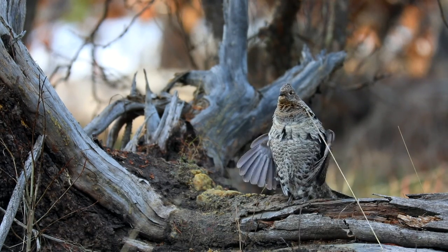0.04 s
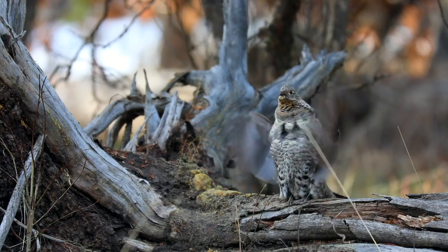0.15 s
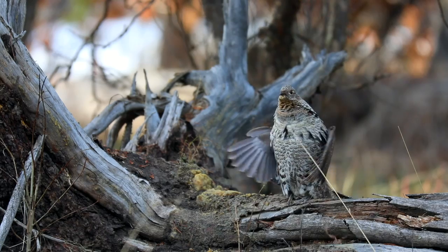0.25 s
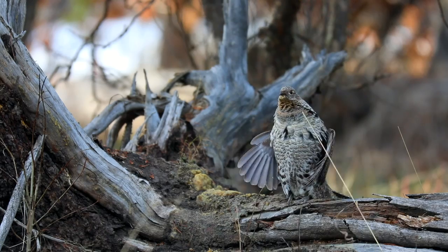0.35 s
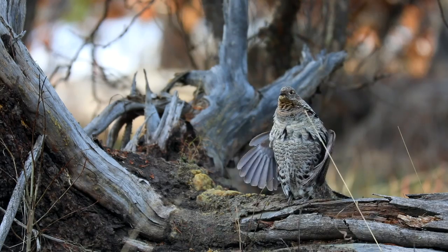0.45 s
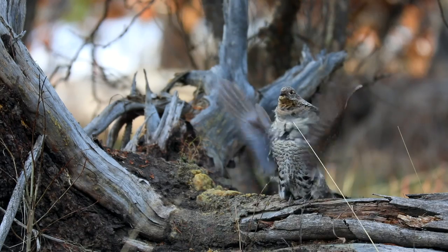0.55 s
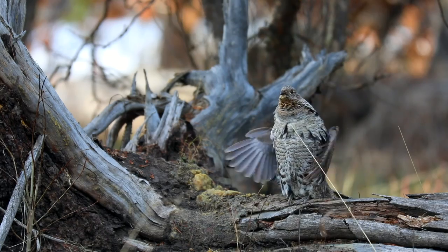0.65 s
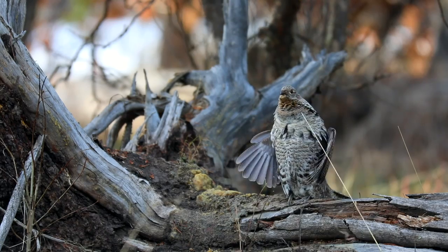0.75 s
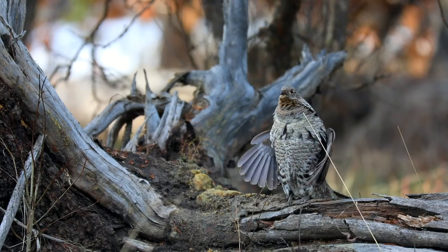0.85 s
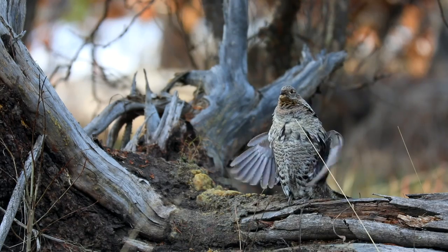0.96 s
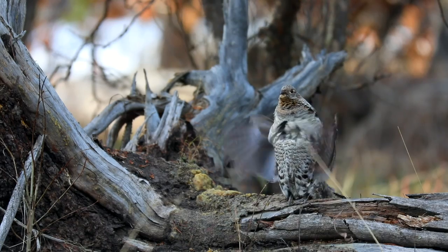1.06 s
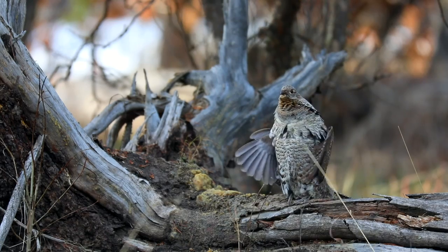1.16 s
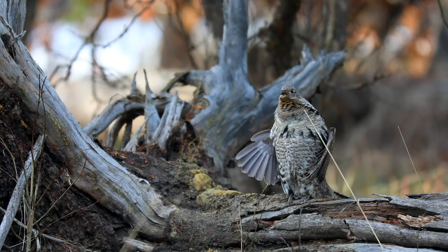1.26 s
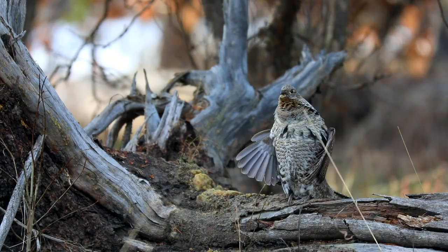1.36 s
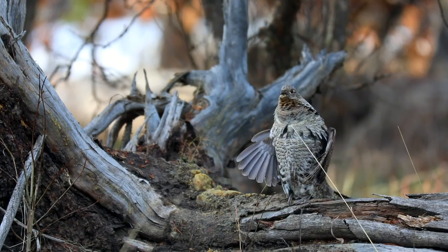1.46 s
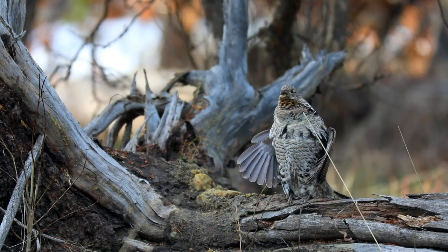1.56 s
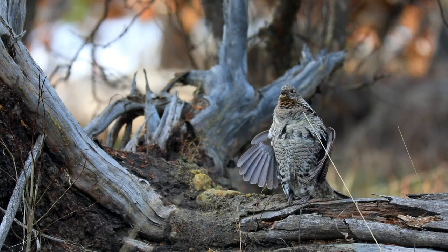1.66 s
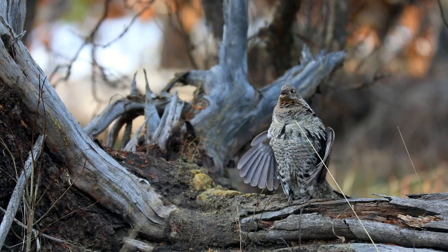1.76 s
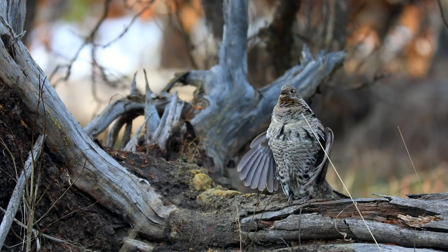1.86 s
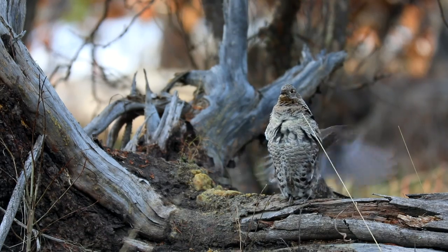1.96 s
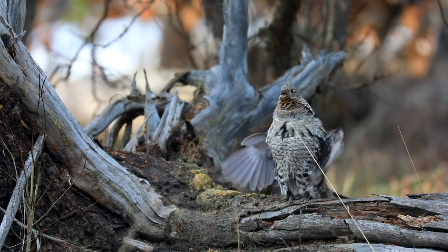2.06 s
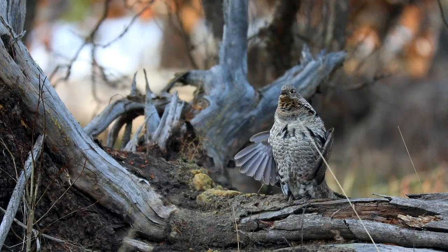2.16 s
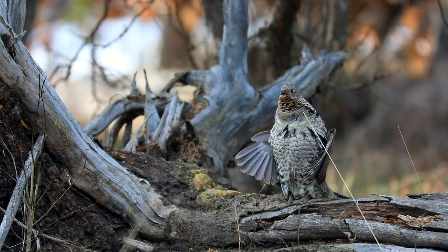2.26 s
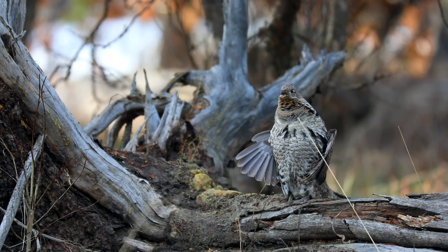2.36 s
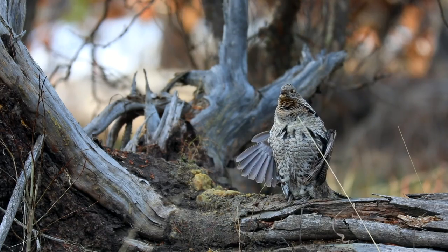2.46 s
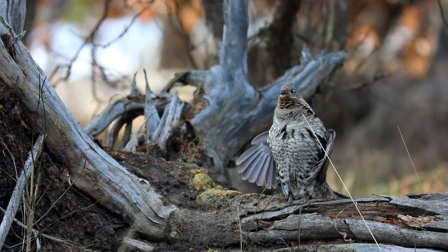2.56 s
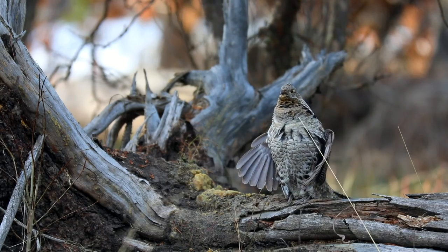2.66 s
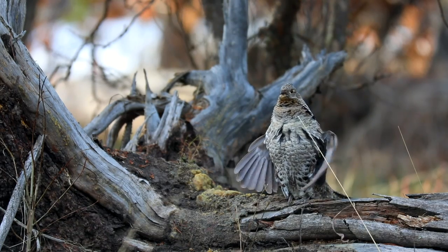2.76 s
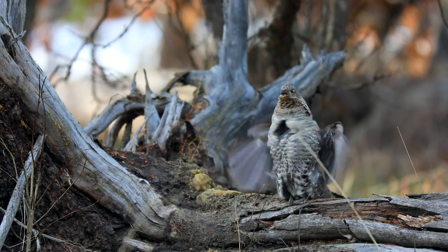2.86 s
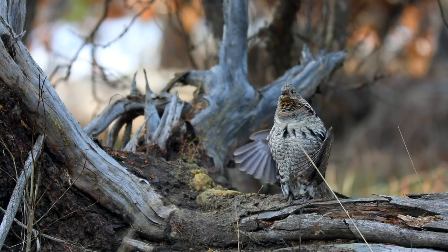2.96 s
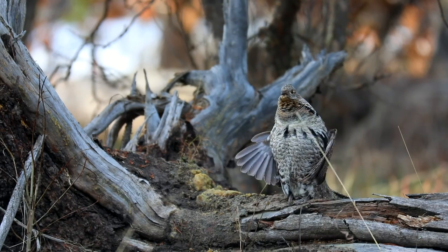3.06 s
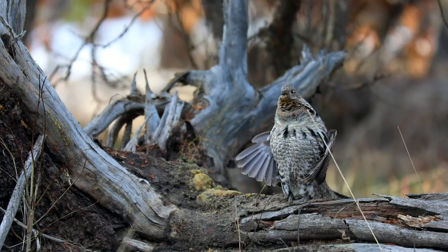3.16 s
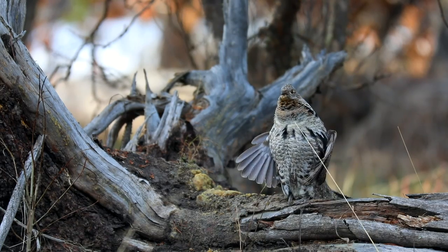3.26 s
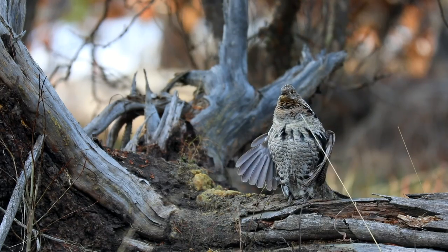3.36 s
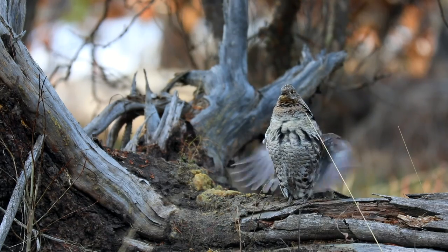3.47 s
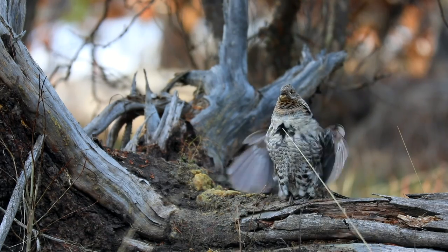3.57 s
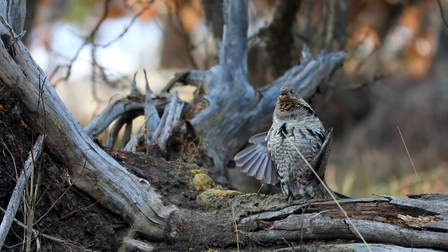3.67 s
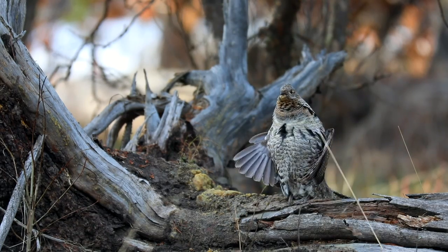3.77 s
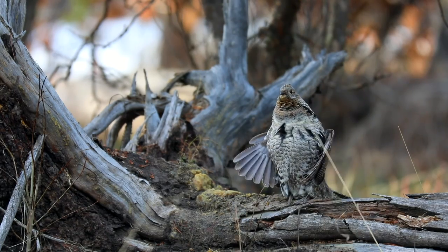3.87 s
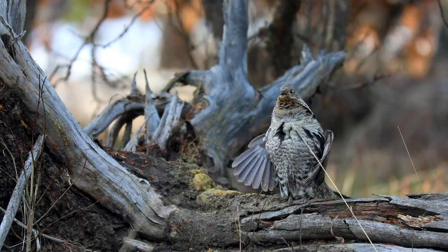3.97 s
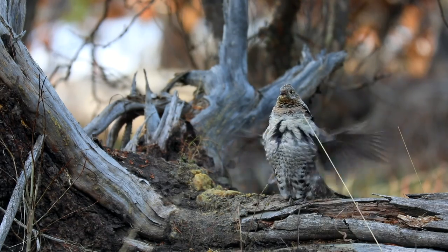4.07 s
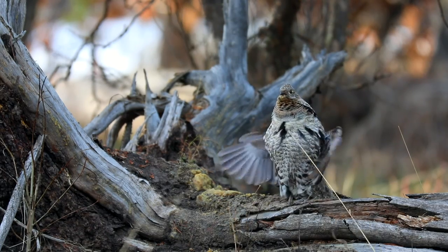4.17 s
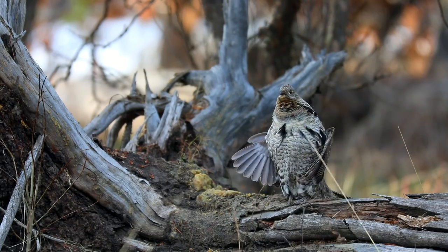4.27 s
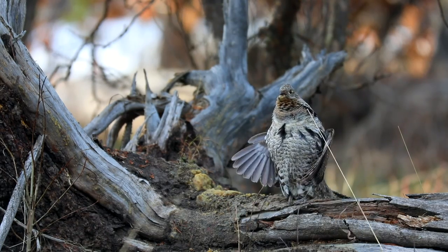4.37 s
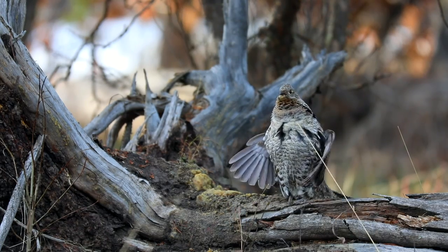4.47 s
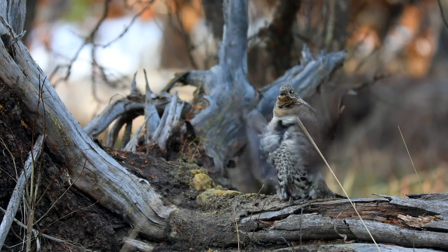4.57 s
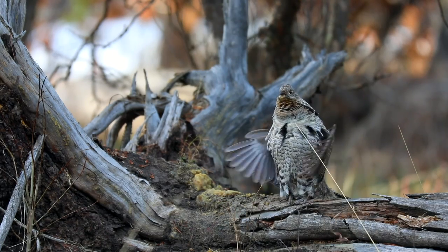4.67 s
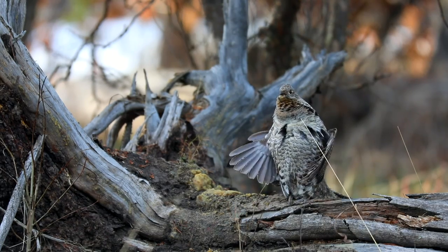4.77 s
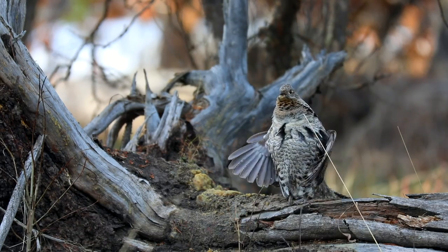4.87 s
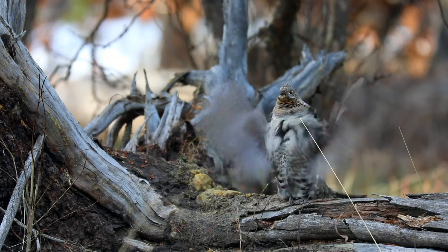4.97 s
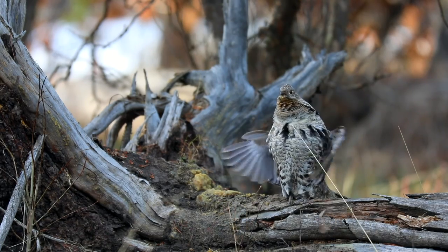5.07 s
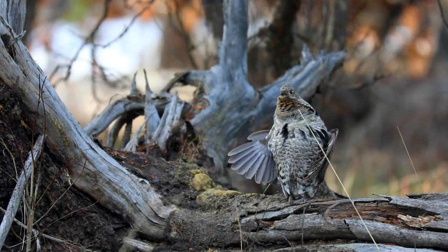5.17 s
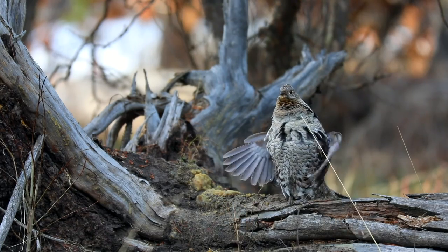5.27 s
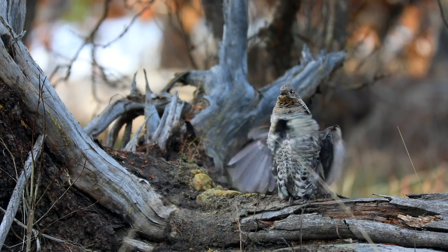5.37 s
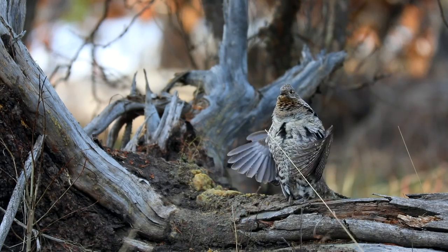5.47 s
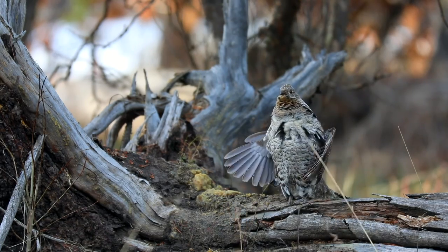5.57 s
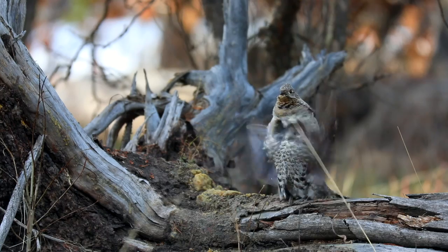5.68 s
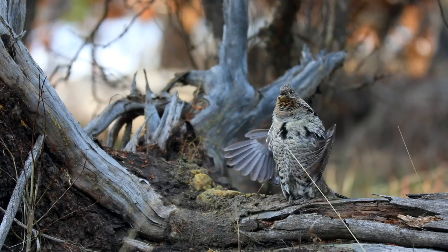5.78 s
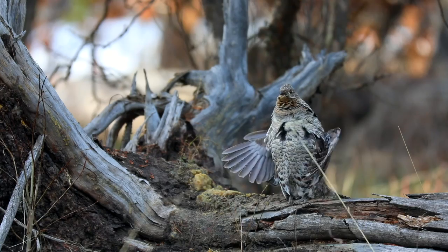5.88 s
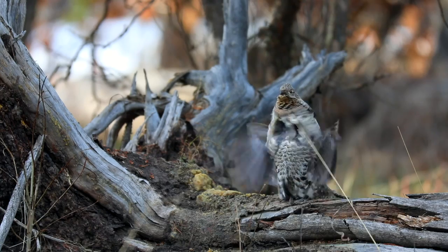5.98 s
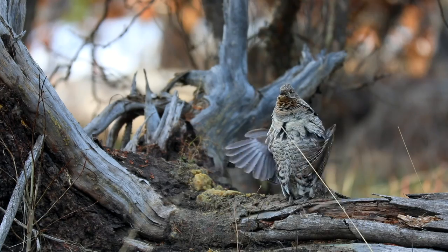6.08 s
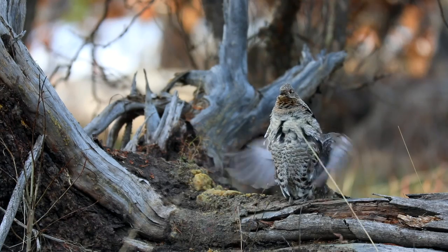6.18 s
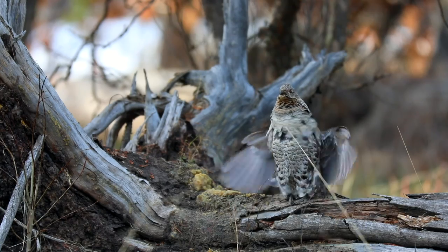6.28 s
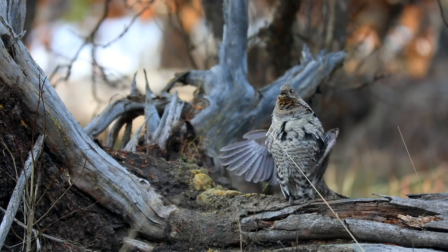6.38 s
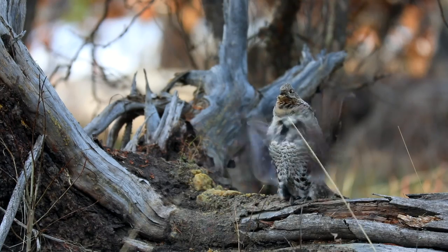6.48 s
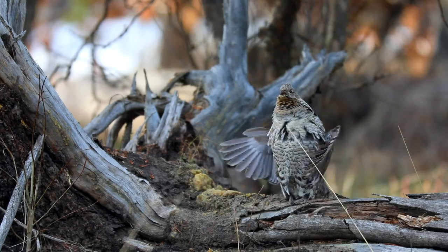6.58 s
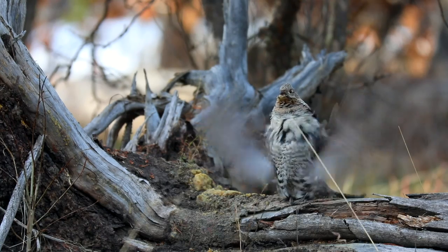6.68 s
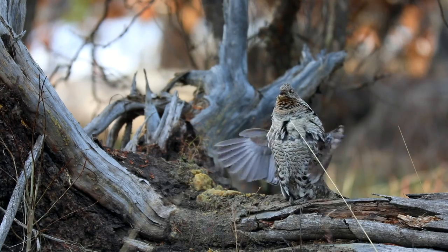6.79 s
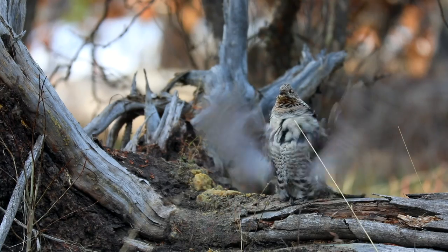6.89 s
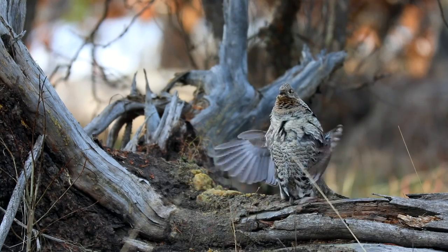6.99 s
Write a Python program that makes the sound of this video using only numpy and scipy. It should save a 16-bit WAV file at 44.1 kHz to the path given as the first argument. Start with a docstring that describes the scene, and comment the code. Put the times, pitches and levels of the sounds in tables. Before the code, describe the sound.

In an open wood with a low breeze and fine leaf hiss, a sweet quick warble runs behind the first slow wing thumps. Low puffs of air stir between them. Distant whistles and a few high chirps follow as the thumps grow and speed up, ending in a fast drumming roll still under way. The bird is near the microphone, whose automatic level ducks on beats and lifts the forest in gaps; trunks return faint echoes.

```python
"""Grouse drumming on a log

Close to the microphone a grouse beats its wings sixteen times, uneven at first, then ever faster.
Each beat is a filtered pulse of air with a brush of feather noise, a knock from the log and faint trunk echoes.
Songbirds warble and whistle as bending tones, smeared by the wood, over filtered noise for wind and leaves.
The recorder's gain control ducks at the thumps and lets the forest swell back in the gaps."""
import sys
import numpy as np
from scipy import signal
from scipy.fft import rfft, irfft
from scipy.io import wavfile
from scipy.ndimage import uniform_filter1d, minimum_filter1d

SR = 44100
rng = np.random.default_rng(int(sys.argv[2]) if len(sys.argv) > 2 else 0)


def generate_wav(signal):
    """Clip the signal to [-1, 1] and save it as 16-bit WAV at the path in sys.argv[1]."""
    frames = np.transpose(np.atleast_2d(signal))
    scaled = np.clip(frames, -1, 1) * 32767
    pcm = np.round(scaled).astype(np.int16)
    wavfile.write(sys.argv[1], SR, pcm)


N = 310102
T = np.arange(N) / SR  # time in seconds

# All levels in the tables are relative: the mix and the recorder set the final ones.

# Colour of the wind in the far treetops. Each row: frequency in Hz, level in dB.
WIND_COLOUR = [(25, 1.5), (60, 7), (150, -5.5), (260, -5), (400, 0), (520, -3), (700, -7), (1000, -12.5),
               (2000, -24.5), (4000, -31.5), (15000, -58.5)]
# The breeze swells once. Each row: time in seconds, level in dB.
BREEZE_LEVEL = [(0, -52), (1.4, -50.5), (1.998, -49.5), (3.8, -51), (7, -51.5)]

# Soft puffs of air as the wings settle. Each row: centre in seconds, width in seconds, level in dB.
WING_PUFFS = [(.01, 0.013, -26.5), (.91, .015, -31.5), (1.019, 0.021, -24), (1.263, 0.015, -28),
              (2.03, 0.021, -38)]
# Soft whooshes of air between the strokes. Each row: centre in seconds, width in seconds, level in dB.
AIR_WHOOSHES = [(.58, 0.039, -53), (1.6, 0.028, -45), (1.9, 0.023, -46), (2.06, 0.034, -50),
                (2.63, 0.037, -54), (2.78, 0.075, -48), (3.35, 0.01, -41), (3.47, 0.023, -40),
                (3.97, 0.018, -48), (4.1, 0.018, -39), (4.6, 0.033, -43)]

# Whistles of a bird deep in the wood.
# Each row: start in seconds, length in seconds, start, middle and end pitch in Hz, level in dB.
FAR_WHISTLES = [(2.35, 0.11, 3130, 3220, 3230, -49.5), (2.465, 0.036, 3156, 3317, 3350, -42.5),
                (2.575, 0.084, 4720, 4170, 3740, -65.5), (2.655, 0.042, 3400, 3270, 3160, -39),
                (2.772, 0.027, 3149, 3250, 3470, -36), (2.84, 0.21, 3310, 3270, 3170, -53.5),
                (2.868, 0.074, 4510, 3917, 3270, -53)]
# Thin high whistles.
# Each row: start in seconds, length in seconds, start, middle and end pitch in Hz, level in dB.
THIN_WHISTLES = [(2.355, 0.037, 7050, 7030, 7080, -34.5), (2.503, 0.12, 6700, 6550, 6490, -39.5),
                 (2.6, .095, 6870, 6620, 6500, -37.5), (2.795, .14, 6450, 6820, 6380, -41),
                 (3.462, 0.026, 7140, 6760, 6320, -55)]
# Long rising calls. Each row: time of the pitch dip in seconds, relative duration, level in dB.
RISING_CALLS = [(1.82, 0.96, -37.5), (2.197, 0.69, -42), (4.24, 0.95, -55.5), (6.385, 0.83, -60.5),
                (6.845, 0.77, -52)]
# Short chips. Each row: time of the pitch dip in seconds, relative duration, level in dB.
SHORT_CHIPS = [(3.8, 0.88, -48), (3.937, 0.81, -30.5), (5.4, 0.86, -58), (5.545, 1.04, -57),
               (5.915, 1.7, -55), (6.06, 0.79, -44)]
# Contour of a rising call, before stretching. Each row: seconds from the dip, pitch in Hz, level in dB.
RISING_CONTOUR = [(-.026, 5680, -20), (-.015, 5300, 3.5), (0, 4627, 7.5), (0.019, 5945, 3),
                  (.085, 6030, -2), (0.158, 6420, -9.5), (0.224, 6650, -2.5), (.24, 6940, -2.5),
                  (0.258, 7300, -41.5)]
# Contour of a chip, before stretching. Each row: seconds from the dip, pitch in Hz, level in dB.
CHIP_CONTOUR = [(-.034, 5900, -15.5), (-.02, 5560, -9), (-.008, 4950, -2), (0, 4830, -7.5),
                (0.009, 5530, -2), (.024, 6700, -0.5), (.034, 6460, -7), (0.041, 6220, -24.5)]

# The warbler's arched notes. Each row: start in seconds, length in seconds, top pitch in Hz, level in dB.
ARCHED_NOTES = [(0, 0.044, 2755, -38), (0.041, 0.031, 2710, -35), (0.201, 0.04, 2644, -26),
                (0.247, 0.029, 2460, -24), (0.413, 0.042, 2510, -28), (0.461, 0.018, 2457, -27),
                (0.601, .037, 2445, -22), (0.643, .02, 2414, -33.5), (0.796, 0.028, 2435, -29),
                (.899, 0.032, 2550, -30), (1.385, 0.042, 2760, -21.5), (1.457, 0.032, 3043, -25.5),
                (1.58, .026, 3523, -51.5), (1.613, .037, 3230, -25.5), (1.653, 0.03, 2753, -27)]
ARCH_START, ARCH_END = .85, .82  # pitch at either end, as a share of the top
# Swoops early in the warble. Each row: start in seconds, level in dB, level of the high flick against it in dB.
SWOOP_TIMES = [(0.141, -32, -6.5), (0.345, -38, -13), (.537, -25.5, -27.5), (0.73, -32.5, -24.5)]
# The high flick over a swoop. Each row: start in seconds from the swoop's start, length in seconds,
# start, middle and end pitch in Hz, level in dB.
HIGH_FLICK = [(-.003, .016, 3920, 4380, 4830, 0)]
# The rise and then the fall of a swoop. Each row: start in seconds from the swoop's start, length in seconds,
# start, middle and end pitch in Hz, level in dB.
SWOOP_NOTES = [(.002, .018, 2824, 3340, 3440, -10.5), (.018, .032, 2724, 2622, 2440, 1)]
# Couplets mid-song. Each row: time of the flick in seconds, pitch of the held note in Hz, its level in dB.
COUPLET_TIMES = [(0.916, 2524, -38.5), (1.018, 2400, -23.5), (1.121, 2485, -33), (1.223, 2365, -27.5),
                 (1.322, 2376, -25)]
# The held note comes first: lead and length in seconds; its pitch rises by this share in each half.
HELD_LEAD_S, HELD_S, HELD_RISE = .049, .037, .012
# The two-voiced flick that ends a couplet. Each row: start in seconds from the flick time, length in seconds,
# start, middle and end pitch in Hz, level in dB.
TWO_VOICED_FLICK = [(-.018, 0.025, 3080, 3556, 4545, -52.5), (-.007, 0.017, 2080, 2190, 2000, -40.5)]

# Wingbeats. Each row: time in seconds, strength in dB, feather brush against it in dB, brush pitch in Hz.
WINGBEATS = [(0.2676, 12.5, -6.5, 4430), (0.676, 13.5, -4, 3400), (1.175, 12.5, -12, 3600),
             (2.1295, 17.5, 6.5, 4400), (2.9722, 19.5, 9, 5140), (3.6502, 21, 2.5, 5350),
             (4.2169, 21.5, 0, 2660), (4.6956, 21, 1.5, 5430), (5.1083, 21, 5, 4577),
             (5.475, 20.5, -0.5, 5100), (5.8095, 21.5, -2.5, 5005), (6.1028, 21, -1, 6270),
             (6.370, 21, -8, 2500), (6.612, 21, 1.5, 5810), (6.8298, 20.5, -1.5, 5460),
             (7.0284, 20, -3, 4320)]
# Pressure lobes of one stroke, wings opening, sweeping forward and snapping back, before each beat reshapes them.
# Each row: seconds from the snap, width in seconds, signed pressure.
PRESSURE_LOBES = [(-.0161, .00107, -.136), (-.00487, .00143, -1), (0, .00142, .93)]
# Echoes from trunks and ground. Each row: delay in seconds, gain.
TRUNK_ECHOES = [(0.029, 0.035), (0.0377, 0.037), (.0481, .019), (.0577, .025), (.0667, .02), (.0762, .019),
                (.0904, .007), (.1027, .005)]
# As the roll quickens, strokes lengthen and their lobes sharpen (share per beat a second).
SOFTNESS, LONGER_PER_HZ, SHARPER_PER_HZ = 1.09, .022, .06
# Strokes weaker than full strength last longer (share per dB).
FULL_DB, SLOWER_PER_DB = 21, .012

TOP_HZ = 15700  # the recorder's top cut


def undb(db):
    """Decibels to gain."""
    return 10 ** (np.asarray(db) / 20)


def noise(colour):
    """Noise of rms 1, coloured by (Hz, dB) points joined along a logarithmic frequency axis."""
    hz, db = np.transpose(colour)
    bins_hz = np.maximum(np.arange(N // 2 + 1) * SR / N, 1)
    gain = undb(np.interp(np.log(bins_hz), np.log(hz), db))
    coloured = irfft(rfft(rng.standard_normal(N)) * gain, N)
    return coloured / coloured.std()


def walk(rate_hz):
    """Smooth random wander with a spread of 1, from one random step per period."""
    step = int(SR / rate_hz)
    stairs = np.repeat(rng.standard_normal(N // step + 1), step)
    smooth = uniform_filter1d(uniform_filter1d(stairs, step), step)[:N]
    return smooth / smooth.std()


def two_pole(x, hz, q, highpass=False):
    """Second-order resonance: a band-pass with unity gain at its peak, or a high-pass."""
    w = 2 * np.pi * hz
    numerator = [1, 0, 0] if highpass else [w / q, 0]
    b, a = signal.bilinear(numerator, [1, w / q, w * w], SR)
    return signal.lfilter(b, a, x + 1e-18)


def bell(t, width):
    """Gaussian swell around t = 0."""
    return np.exp(-.5 * (t / width) ** 2)


def woods(x, t60, wet_db):
    """Direct sound plus the scatter from many trunks: a noise tail that falls 60 dB in t60 seconds."""
    t = T[:SR]
    decay = np.exp(-np.log(1000) * t / t60)
    tail = rng.standard_normal(SR) * decay * (t > .006)
    tail = tail / np.linalg.norm(tail)
    return x + undb(wet_db) * signal.fftconvolve(x, tail)[:N]


def forest():
    """Wind that swells in small gusts, band by band, under a fine even hiss of leaves."""
    s, db = np.transpose(BREEZE_LEVEL)
    wind = noise(WIND_COLOUR)
    gusts = sum(walk(14) * two_pole(wind, hz, q=5.3) for hz in (330, 420, 540))
    breeze = undb(np.interp(T, s, db) + 1.4 * walk(8.5))
    leaves = noise([(200, -9.5), (1500, .5), (4000, -.5), (9000, -2), (12000, -6.5), (15000, -13)])
    return (wind + .5 * gusts) * breeze + undb(-68) * leaves


def swells(table):
    """Level curve of separate bell-shaped swells of air."""
    return sum(undb(db) * bell(T - s, width) for s, width, db in table)


def stirred_air():
    """Deep puffs and soft whooshes between the strokes: turbulence heard as swelling coloured noise."""
    deep = noise([(20, 3), (55, 10.5), (100, -12), (200, -38.5), (600, -68), (5000, -100)])
    soft = noise([(100, -10.5), (250, -4.5), (380, 4), (550, -1.5), (900, -26.5), (5000, -54)])
    return swells(WING_PUFFS) * deep + swells(AIR_WHOOSHES) * soft


def whistle(t, hz, db, overtone_db, waver):
    """A nearly pure tone along a pitch and level contour, with a faint octave."""
    knots = t[::150]  # the pitch wavers randomly between these times
    wander = np.interp(t, knots, rng.standard_normal(len(knots)))
    phase = 2 * np.pi * np.cumsum(hz * (1 + waver * wander)) / SR
    tone = np.sin(phase) + undb(overtone_db) * np.sin(2 * phase)
    return np.sqrt(2) * undb(db) * tone


def notes(table, overtone_db, waver):
    """Each note bends through three pitches while it swells and fades."""
    out = np.zeros(N)
    for s, length, start, middle, end, db in table:
        i = np.arange(max(int(s * SR), 0), int((s + length) * SR))
        u = np.linspace(0, 1, len(i))  # progress through the note
        bend = np.polyfit([0, .5, 1], [start, middle, end], 2)
        swell = np.abs(np.sin(np.pi * u)) ** 1.11
        out[i] += whistle(T[i], np.polyval(bend, u), db, overtone_db, waver) * swell
    return out


def calls(table, contour, waver):
    """One contour of pitch and level sung again and again, quicker or slower."""
    out = np.zeros(N)
    at, hz, contour_db = np.transpose(contour)
    for s, stretch, db in table:
        times = s + stretch * at
        i = np.arange(int(times[0] * SR), min(int(times[-1] * SR), N))
        pitch = np.interp(T[i], times, hz)
        level_db = db + np.interp(T[i], times, contour_db)
        out[i] += whistle(T[i], pitch, level_db, overtone_db=-59.5, waver=waver)
    return out


def place(motif, s, db):
    """Set a motif's notes at a time and level in the song."""
    return [(s + at, *bend, db + note_db) for at, *bend, note_db in motif]


def warble():
    """A song of bending tones in three kinds of syllable: arches, swoops and couplets."""
    song = [(s, length, ARCH_START * hz, hz, ARCH_END * hz, db) for s, length, hz, db in ARCHED_NOTES]
    for s, db, flick_db in SWOOP_TIMES:
        song += place(SWOOP_NOTES, s, db)
        song += place(HIGH_FLICK, s, db + flick_db)
    for s, hz, db in COUPLET_TIMES:
        song.append((s - HELD_LEAD_S, HELD_S, hz * (1 - HELD_RISE), hz, hz * (1 + HELD_RISE), db))
        song += place(TWO_VOICED_FLICK, s, 0)
    return notes(song, overtone_db=-40.5, waver=.021)


def songbirds():
    """Far whistles, smeared most by the wood, high calls, and a warble that lingers among the trees."""
    far = woods(notes(FAR_WHISTLES, overtone_db=-36, waver=.026), t60=.32, wet_db=4)
    high = calls(RISING_CALLS, RISING_CONTOUR, waver=.011)
    high += calls(SHORT_CHIPS, CHIP_CONTOUR, waver=.0055)
    high += notes(THIN_WHISTLES, overtone_db=-58.5, waver=.0045)
    high = woods(high, t60=.13, wet_db=-8)
    warbler = woods(woods(warble(), t60=.15, wet_db=-9), t60=1, wet_db=-25.5)
    return undb(-6) * warbler + undb(-6) * high + undb(-8.5) * far


def grouse():
    """Each stroke shoves the air; it rushes through the wings and the feathers brush at the turn."""
    push, rush, feathers = np.zeros((3, N))
    vanes = noise([(1000, -12.5), (3200, -5.5), (4400, 0), (5400, 5), (7000, -2), (9000, -22), (15000, -33)])
    grain = undb(1.8 * walk(500))
    gaps = np.diff([beat[0] for beat in WINGBEATS])
    rates = 1 / np.r_[gaps[0], gaps]  # beats a second
    for (s, db, brush_db, brush_hz), rate in zip(WINGBEATS, rates):
        stretch = 1 + LONGER_PER_HZ * rate + SLOWER_PER_DB * (FULL_DB - db)
        soft = SOFTNESS - SHARPER_PER_HZ * rate
        near = slice(int((s - .08) * SR), int((s + .08) * SR))
        t = (T[near] - s) / stretch
        # a sharper stroke moves the same air in less time
        lobes = sum(size * bell(t - at, width * soft) for at, width, size in PRESSURE_LOBES)
        push[near] += undb(db) / soft * lobes
        rush[near] += undb(db) * bell(t - .003, .012)
        # the feathers meet differently each time, so each brush has its own pitch
        zip_tone = undb(14.5) * two_pole(rng.standard_normal(len(t)), brush_hz, q=18)
        brush = undb(db + brush_db) * (bell(t + .0069, .0023) + .24 * bell(t - .004, .0063))
        feathers[near] += brush * grain[near] * (vanes[near] + zip_tone)
    thump = two_pole(push, hz=70.8, q=1.353)
    echoes = sum(gain * np.interp(T - delay, T, thump) for delay, gain in TRUNK_ECHOES)
    # the log under the bird answers with a short hollow knock
    knock = undb(-10.5) * two_pole(push, hz=350, q=4.5) + undb(-13) * two_pole(push, hz=430, q=7.1)
    knock = woods(knock, t60=.18, wet_db=-13.5)
    air = rush * noise([(100, -7.5), (300, 6.5), (450, -1.5), (800, -18), (2000, -25.5),
                        (2800, -26.5), (4000, -34), (12000, -53.5)])
    air = woods(air, t60=.55, wet_db=-9.5)
    return thump + echoes + knock + undb(-49) * air + undb(-68) * feathers


def scene():
    """The forest, the stirred air and the songbirds behind the close grouse, on one channel."""
    return (forest() + stirred_air() + songbirds() + grouse())[None]


def gain_control(x, threshold_db, ratio, hold_s, release_db_per_s, attack_s, start_db):
    """Turns down fast on loud sound, holds, then creeps back up; begins turned down by start_db."""
    over_db = np.maximum(20 * np.log10(np.abs(x) + 1e-9) - threshold_db, 0)
    cut_db = over_db * (1 - 1 / ratio)
    cut_db[0] = start_db
    # hold each peak of the cut
    half = int(hold_s * SR / 2)
    cut_db = -minimum_filter1d(-cut_db, 2 * half + 1, origin=half)
    # release along a straight line in dB
    ramp_db = release_db_per_s * T
    cut_db = np.maximum.accumulate(cut_db + ramp_db) - ramp_db
    # the attack smooths every change
    k = np.exp(-1 / (attack_s * SR))
    smooth_db = start_db + signal.lfilter([1 - k], [1, -k], cut_db - start_db)
    return x * undb(-smooth_db)


def record(dry):
    """Gain control, a faint steady hiss, the wind filter's bass cut and the top cut."""
    y = gain_control(dry[0], threshold_db=-24.5, ratio=1.857, hold_s=.057,
                     release_db_per_s=25.5, attack_s=.00081, start_db=11.5)
    hiss = noise([(100, 2), (900, 3), (2000, -8.5), (5000, -16.5), (10000, -19), (15000, -25.5)])
    y = two_pole(y + undb(-80) * hiss, hz=81.6, q=.53, highpass=True)
    top_cut = signal.ellip(8, .2, 70, TOP_HZ, fs=SR, output="sos")
    return signal.sosfilt(top_cut, y)[None]


dry = scene()
out = record(dry)
generate_wav(out)
```